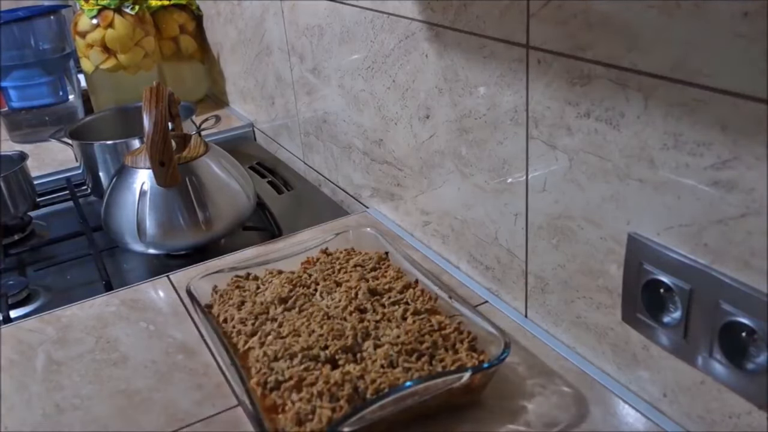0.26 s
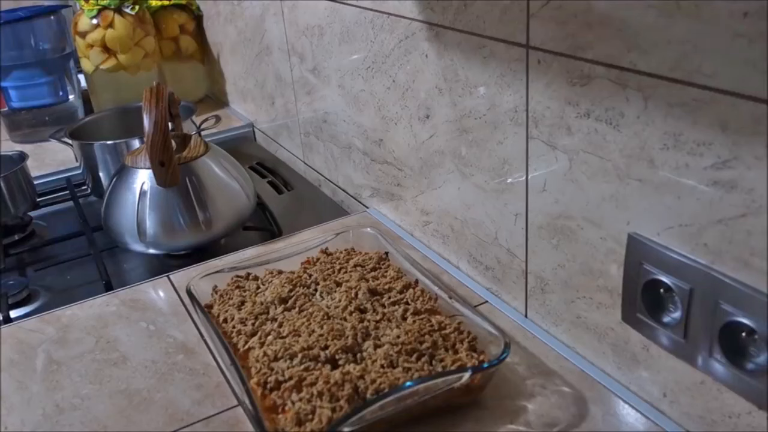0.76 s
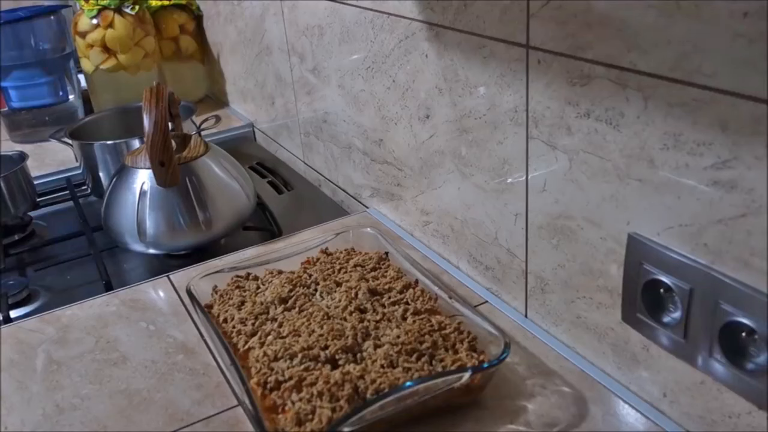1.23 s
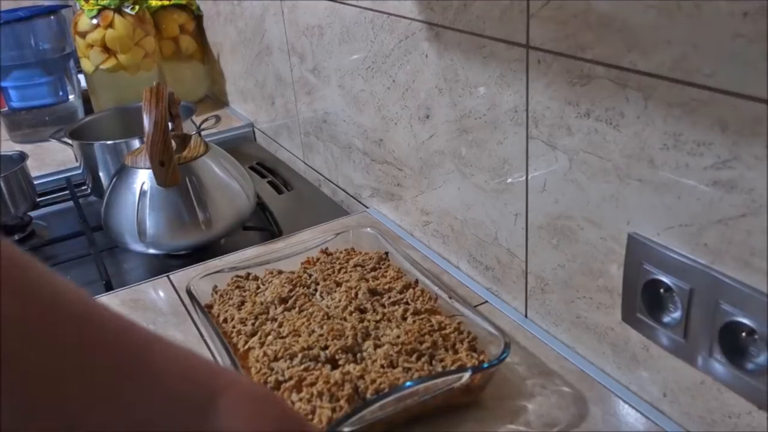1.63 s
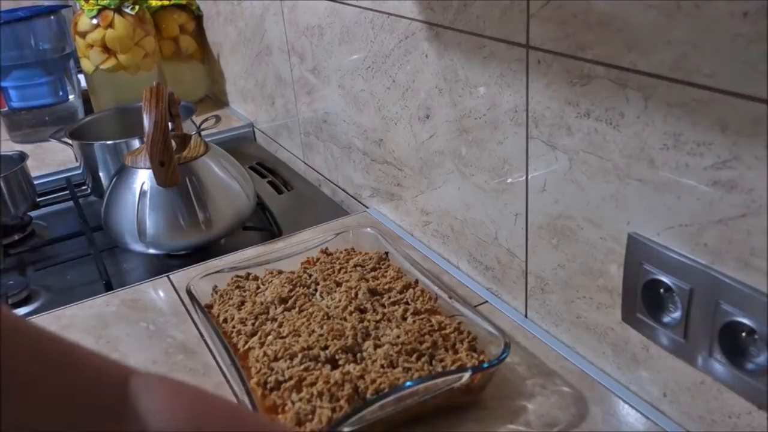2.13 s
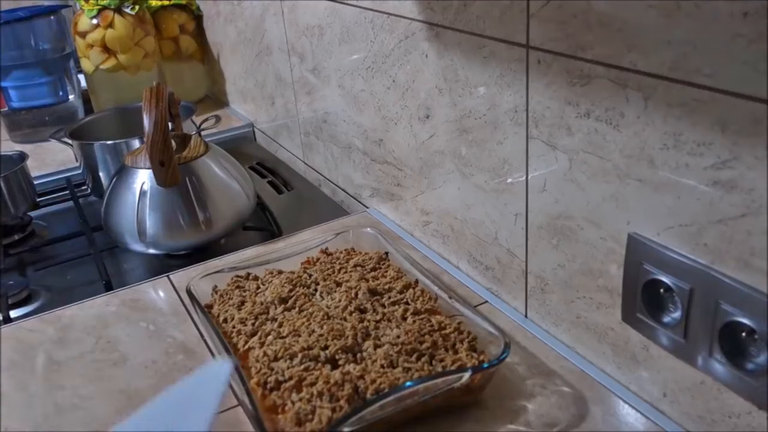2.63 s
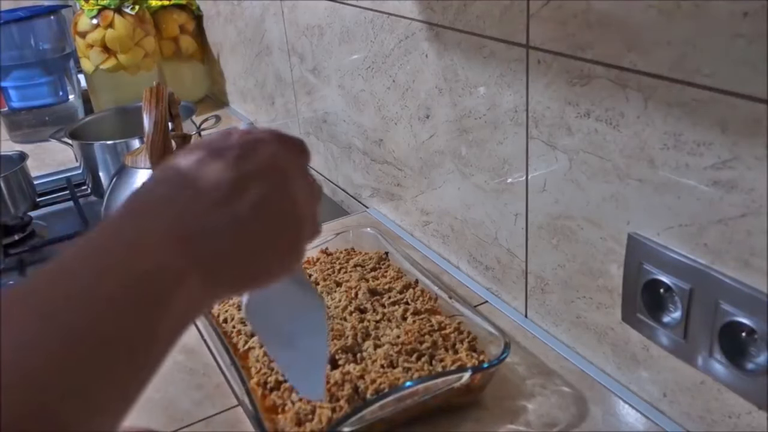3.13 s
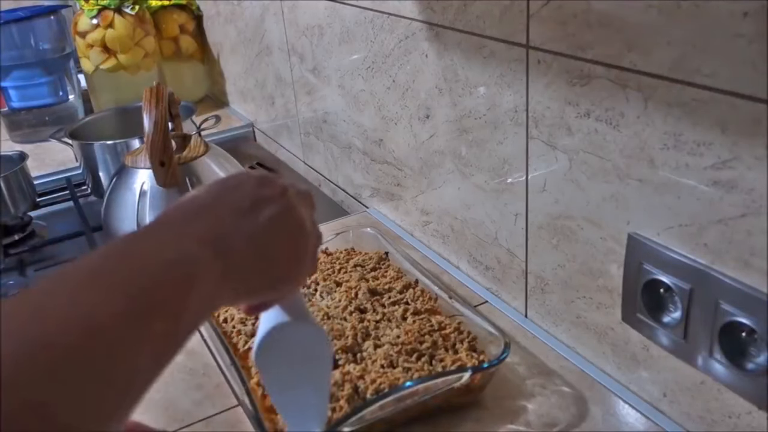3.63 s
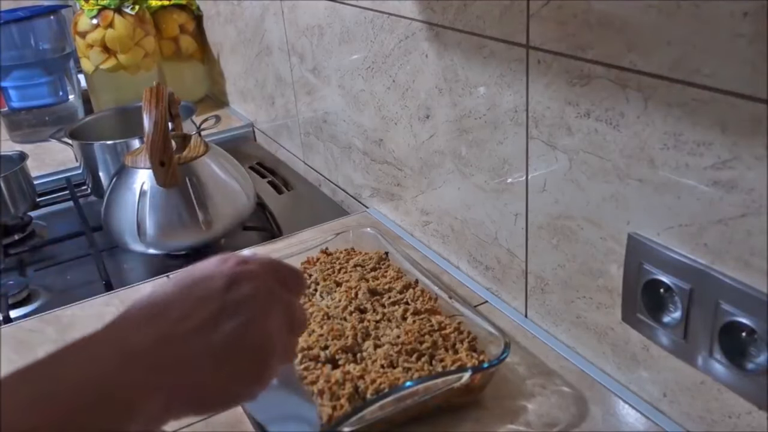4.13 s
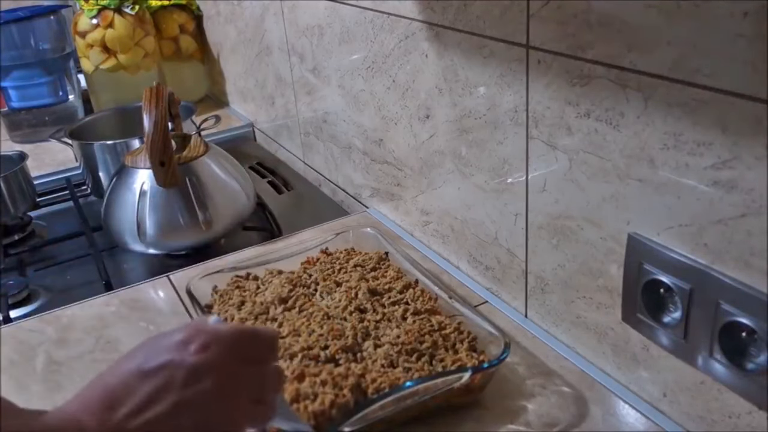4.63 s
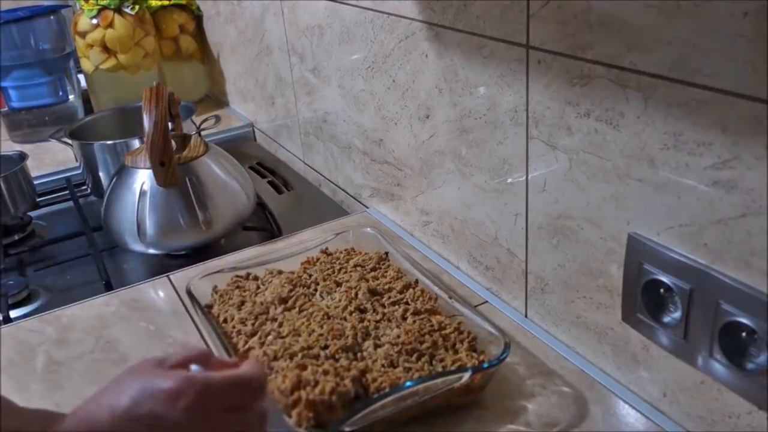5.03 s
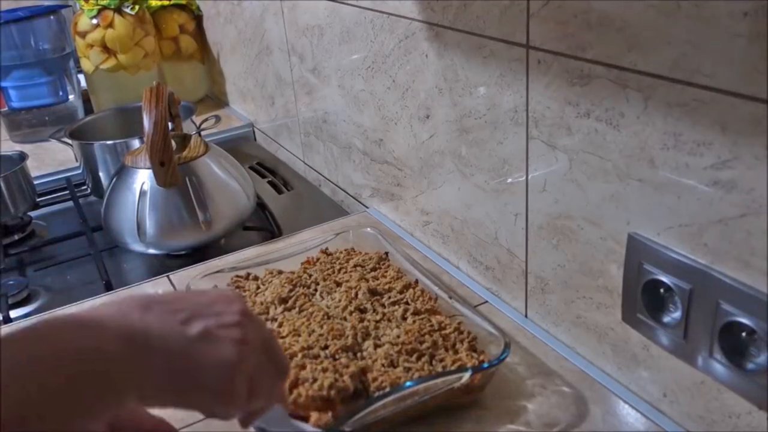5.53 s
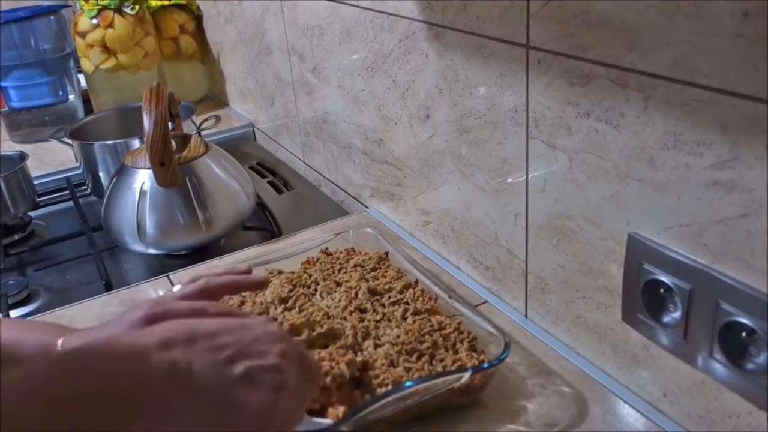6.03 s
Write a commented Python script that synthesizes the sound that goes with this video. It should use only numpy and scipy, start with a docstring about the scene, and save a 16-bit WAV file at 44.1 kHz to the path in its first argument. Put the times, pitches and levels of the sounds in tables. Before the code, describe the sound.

Close stereo microphone in a small echoing tiled kitchen, with soft air hiss and faint mains hum. Light crumb brushes, then a heavy object lands with a loud clattering thud. A hard server scrapes in short bright strokes with sharp knocks on the dish, followed by one long crunching drag. Afterwards it is quieter, with dull knocks and faint rustles until the end.

```python
"""In a quiet tiled kitchen a hard cake server brushes lightly over crumbs, then something heavy lands and rattles.
The blade scrapes in short strokes and one long drag; knocks on the dish and more light brushes follow to the end.
Scrapes and brushes are random clicks that drive resonances; knocks and the landing are fading sines with a noise
burst; a few faint blurred tones are narrow noise. A close pair of microphone ports hears all this with the room's
echoes, over steady air noise, hiss and a mains hum."""
import sys
import numpy as np
from scipy import signal
from scipy.fft import rfft, irfft, next_fast_len
from scipy.io import wavfile
from scipy.ndimage import uniform_filter1d

SR = 44100
rng = np.random.default_rng(int(sys.argv[2]) if len(sys.argv) > 2 else 0)


def wav_out(sig):
    """Save sig, one row per channel (or a flat mono array), as 16-bit PCM at SR to the path in sys.argv[1]."""
    wavfile.write(sys.argv[1], SR, np.round(np.clip(np.atleast_2d(sig).T, -1, 1) * 32767).astype(np.int16))


N = 276941  # length in samples
SPLIT_HZ = 2600  # sounds are levelled separately under and over this pitch


def add_strokes(mix):
    """Short scrapes: crumbs snapping under the blade make it ring, most near the pitch that the grip favours."""
    # scrapes: start_s, rise_s, hold_s, level_db (under 2.6 kHz), treble_db (over 2.6 kHz against level_db),
    # ring_db (rings against the broad body), grip_hz (pitch that the grip favours)
    touches = [(1.498, 0.054, 0.01, -30, 8.5, -7.5, 5550), (1.548, 0.034, 0.059, -25.5, 4, -3, 5130),
               (1.74, 0.015, 0.039, -25.5, 7, -2.5, 6640), (1.926, 0.0085, 0.036, -24, -3, -10, 7160),
               (2.173, 0.0039, 0.056, -29.5, -8.5, -3.5, 4070)]
    # rings of the blade: pitch_hz, width_hz, level_db
    blade_rings = [(363, 67, 1), (1710, 32, 11), (2128, 36, 6.5), (3020, 52, 1), (3310, 32, -0.5),
                   (4075, 43, 2), (5150, 140, -2), (5150, 260, -1), (6180, 40, -4.5), (6450, 93, -3.5),
                   (8010, 27, -2), (10100, 67, -7.5), (10700, 90, -15)]
    # broad colour of the breaking crumbs: pitch_hz, level_db (per Hz)
    crumb_colour = [(59, -53), (100, -16), (363, -3.5), (1240, 0.5), (2090, -4.5), (2590, -13), (8210, -22),
                    (11500, -33.5)]
    favour_db_per_octave = 10  # treble rings fall off away from the favoured pitch
    for *touch, ring_db, grip_hz in touches:
        rows = gesture(*touch, start_db=-9, fade_db_per_s=130, dull_db_per_s=44)
        gripped = []
        for hz, width, db in blade_rings:
            if hz > SPLIT_HZ:
                db = db - favour_db_per_octave * abs(np.log2(hz / grip_hz))
            gripped.append((hz, width, db))
        add(mix, *friction(rows, crumb_colour, gripped, ring_db, snaps_per_s=2200.0, spread_db=3.5, rub=0.84,
                           judder_db=2.0, patchy_db=5.0))


def add_drag(mix):
    """One long drag over crumbs and glass: the rings sag in pitch as the blade is pressed."""
    # course of the drag: time_s, level_db (under 2.6 kHz), treble_db (over 2.6 kHz against level_db)
    course = [(2.355, -37, -1), (2.385, -29, -1.5), (2.5, -24.5, -4.5), (2.66, -20, -7), (2.75, -18, -8),
              (2.98, -18.5, -10), (3.098, -24, -7.5), (3.19, -28.5, -13.5), (3.35, -43, -5), (3.62, -60, 0)]
    # rings under the drag: pitch_hz, width_hz, level_db
    drag_rings = [(390, 61, -11), (967, 116, -0.5), (1525, 143, -4.5), (1980, 145, 5), (3494, 67, 4),
                  (4944, 76, -0.5), (5420, 66, -1), (6087, 33, 3.5), (7450, 120, -11), (8250, 100, -13),
                  (10060, 61, -16.5), (10630, 45, -15)]
    # broad colour of the breaking crumbs: pitch_hz, level_db (per Hz)
    crumb_colour = [(59, -77), (100, -42), (378, -17), (1490, -5.5), (4260, -19.5), (6210, -20.5),
                    (10400, -38), (11500, -46)]
    # pressing bends rings under 5.7 kHz and shifts the balance:
    # time_s, pitch_factor, deep_db (rings under 1.7 kHz), shrill_db (rings over 2.6 kHz)
    pressing = [(2.4, 1.04, 2, -10), (2.65, 1.014, 0, -7), (2.75, 0.99, 2, -2), (3.0, 0.99, 6, -4),
                (3.3, 0.99, 8, -14)]
    add(mix, *friction(course, crumb_colour, drag_rings, 6.3, snaps_per_s=2800.0, spread_db=3.0, rub=0.76,
                       judder_db=1.0, patchy_db=2.5, press=pressing))


def add_landing(mix):
    """The heavy thing lands and rocks: each contact rings its modes over a short thud."""
    # contacts: start_s, peak_db (under 2.6 kHz), ring_db (rings against the thud)
    contacts = [(.889, -5, -0.5), (.915, -8.5, 1), (.945, -11.5, -4.5), (0.999, -19, -14),
                (1.042, -35, -26), (1.075, -26.5, -24)]
    # modes of the heavy thing: pitch_hz, level_db, t60_s (time to fade by 60 dB)
    heavy_modes = [(141, -5, 0.2), (276, 7, 0.15), (367, 11.5, 0.24), (574, -9, 0.067), (720, 8, 0.12),
                   (816, 1, 0.24), (1142, -1.5, 0.37), (2902, 5, 0.48), (3240, 10, 0.23), (4060, 19, 0.15),
                   (5610, 9, 0.099), (7640, 6, 0.061)]
    tick_db = -29.5  # every contact ticks alike over 2.6 kHz, however hard
    for s, peak_db, ring_db in contacts:
        add(mix, s, blow(heavy_modes, peak_db, tick_db - peak_db, ring_db, spot_hz=1310, crack_s=0.031,
                         tick_s=0.018, crack_hz=970, rise_s=0.0008, luck_db=2.5, detune=0))


def add_knocks(mix):
    """Knocks on the dish: each blow rings the dish and sends a dull thud through the worktop."""
    # knocks: start_s, peak_db (under 2.6 kHz), treble_db (over 2.6 kHz against peak_db),
    # spot_hz (pitch that the struck spot favours), ring_db (rings against the crack),
    # thud_db (peak of the worktop), thud_hz (pitch that the thud favours)
    hits = [(0.729, -38, 6, 1100, -10, -37, 348), (0.737, -45, 15, 3500, -15, -50, 350),
            (1.37, -49, -22, 1010, 5, -49, 350), (1.551, -10, 0.5, 2060, 1, -52, 362),
            (1.752, -22.5, 13, 2190, -10, -49, 370), (1.817, -20.5, 6, 2100, -20, -45, 370),
            (1.935, -12, 3.5, 1390, -15, -21, 368), (1.982, -10.5, -20, 1490, -6.5, -20, 380),
            (2.03, -19.5, 1.5, 1200, -2, -28.5, 403), (2.287, -26, -3, 858, -7, -10.5, 360),
            (2.311, -38, 4, 900, 9, -31, 362), (2.52, -14.5, -1.5, 1620, -11, -19.5, 367),
            (2.989, -8, -8, 1540, -8, -23.5, 380), (3.824, -19.5, -23, 1470, -1, -13, 443),
            (3.863, -28.5, -29, 1800, -9, -29, 447), (4.087, -36.5, 3, 1210, -13, -48, 400),
            (4.181, -37, 5, 1230, -14, -40, 460), (4.725, -56, -21, 800, -4, -33.5, 402),
            (5.206, -25, -16, 1000, -8, -22.5, 435), (5.33, -40, 5, 1260, -10, -34, 496),
            (5.438, -20, -22, 1780, -3, -33, 420), (5.552, -39, -11, 804, -5, -32.5, 370),
            (5.606, -55, -15, 800, -5, -35.5, 370), (5.637, -20.5, -14, 1480, -19, -31, 453),
            (5.745, -15, -7, 2100, 4, -26.5, 457), (6.042, -38.5, -10, 885, 20, -32.5, 264)]
    # modes of the dish: pitch_hz, level_db, t60_s
    dish_modes = [(858, 2, 0.04), (990, -16, 0.1), (1200, -22, 0.059), (1500, -30, 0.045),
                  (1784, -5.5, 0.065), (2167, -3.5, 0.044), (3520, -1, 0.062), (3850, -7, 0.056),
                  (4970, -3.5, 0.07)]
    # modes of the worktop: pitch_hz, level_db, t60_s
    worktop_modes = [(251, -10, 0.15), (372.5, 2.5, 0.094), (443, 0.5, 0.072), (568, -3.5, 0.11)]
    for s, peak_db, treble_db, spot_hz, ring_db, thud_db, thud_hz in hits:
        add(mix, s, blow(dish_modes, peak_db, treble_db, ring_db, spot_hz, crack_s=0.013, tick_s=0.011,
                         crack_hz=1930, rise_s=0.0026, luck_db=4.5, detune=0.0089))
        add(mix, s, blow(worktop_modes, thud_db, -52, 6, thud_hz, crack_s=0.021, tick_s=0.0024,
                         crack_hz=550, rise_s=0.0046, luck_db=1.5, detune=.006))


def add_rustles(mix):
    """Light brushes over the crumbs: soft, even snaps with little ringing."""
    # brushes: start_s, rise_s, hold_s, level_db (under 2.6 kHz), treble_db (over 2.6 kHz against level_db)
    brushes = [(0.24, 0.048, 0.0095, -45, -6), (0.507, 0.0052, 0.0093, -41, 0.5),
               (0.725, 0.0022, 0.0066, -44.5, 5.5), (0.754, 0.0067, 0.018, -42.5, -24),
               (1.148, 0.14, 0.11, -50.5, -34), (3.623, 0.14, .04, -51.5, -4.5),
               (4.097, .02, 0.2, -58.5, -8), (5.318, 0.012, 0.064, -50.5, -3),
               (5.481, 0.13, 0.12, -47.5, -7), (5.756, 0.011, 0.12, -50.5, -6.5),
               (6.024, 0.065, 0.013, -51, -7)]
    # rings under the brushes: pitch_hz, width_hz, level_db
    brush_rings = [(1160, 350, 4.5), (2200, 43, -5), (3560, 160, 4.5), (5130, 77, -15)]
    # broad colour of the crumbs: pitch_hz, level_db (per Hz)
    crumb_colour = [(59, -61), (100, -4), (323, -7), (906, -17.5), (5410, -9.5), (10800, -21), (11500, -20)]
    for brush in brushes:
        rows = gesture(*brush, start_db=-6.5, fade_db_per_s=119, dull_db_per_s=-9)
        add(mix, *friction(rows, crumb_colour, brush_rings, -9.5, snaps_per_s=2600.0, spread_db=0.5, rub=0.67,
                           judder_db=1.7, patchy_db=5.0))


def add_blurred_tones(mix):
    """Brief blurred tones: noise through a narrow resonance. Some sound as if a rub fed one mode of the
    worktop; others ring along with a knock on the dish."""
    # tones: start_s, length_s, pitch_hz, level_db
    tones = [(0.735, 0.136, 339, -42.5), (5.225, 0.059, 450, -36.5), (4.09, 0.041, 1200, -39),
             (5.325, 0.028, 1300, -47)]
    width_hz, fade_db = 24, -7  # the fade is spread over the whole length
    for start, length, hz, level_db in tones:
        t = np.arange(0, length, 1 / SR)
        once = resonate(rng.standard_normal(len(t)), hz, width_hz)
        tone = evened(resonate(once, hz, width_hz))
        level = gain_of(level_db + fade_db * t / length)
        add(mix, start, level * tone * signal.windows.tukey(len(t), .15))


def utensil():
    """All that the hands set ringing, before the room."""
    mix = np.zeros(N)
    add_strokes(mix)
    add_drag(mix)
    add_landing(mix)
    add_knocks(mix)
    add_rustles(mix)
    add_blurred_tones(mix)
    return mix


def gesture(start, rise, hold, level_db, treble_db, start_db, fade_db_per_s, dull_db_per_s):
    """Rise, hold and release of one touch as rows (time_s, level_db, treble_db); the colour drifts in release."""
    release_s = .2
    top = start + max(rise, .002)
    end = top + max(hold, .002)
    return [(start, level_db + start_db, treble_db),
            (top, level_db, treble_db),
            (end, level_db, treble_db),
            (end + release_s, level_db - fade_db_per_s * release_s, treble_db - dull_db_per_s * release_s)]


def friction(rows, body, ring, ring_db, snaps_per_s, spread_db, rub, judder_db, patchy_db, press=((0, 1, 0, 0),)):
    """Crumbs snap under the blade: clicks of uneven size over a fine rub drive a broad body and the rings."""
    s, level_db, treble_db = np.transpose(rows)
    t = np.arange(s[0], s[-1], 1 / SR)
    fine, chance, size = rng.standard_normal((len(t), 3)).T
    snapping = abs(chance) < 1.25 * snaps_per_s / SR  # 1.25 turns the bell curve's height into a rate
    snaps = gain_of(spread_db * abs(size)) * np.sign(size) * snapping
    grip = gain_of(judder_db * wander(len(t), 0.019))  # the grip slips and holds
    drive = (evened(snaps) + rub * fine) * grip

    at, factor, deep_db, shrill_db = np.transpose(press)
    sag = np.interp(t, at, factor)
    deep, shrill = gain_of(np.interp(t, at, deep_db)), gain_of(np.interp(t, at, shrill_db))
    rung = np.zeros(len(t))
    for k, (hz, width, db) in enumerate(ring):
        fed = drive * gain_of(patchy_db * wander(len(t), 0.016))  # the contact moves on and off each mode
        if hz < 1700:
            fed *= deep
        elif hz > SPLIT_HZ:
            fed *= shrill
        pitch = hz * (1 + 0.013 * wander(len(t), 0.034))  # the contact pulls the pitch about
        if hz < 5700:
            pitch = pitch * sag
        rung += (-1) ** k * gain_of(db) * resonate(fed, pitch, width)  # neighbours take opposite signs

    low, high = halves(evened(coloured(drive, body)) + gain_of(ring_db) * evened(rung))
    sound = evened(low) + gain_of(np.interp(t, s, treble_db)) * evened(high)
    level = gain_of(np.interp(t, s, level_db))
    return s[0], level * sound * signal.windows.tukey(len(t), .03)


def blow(modes, peak_db, treble_db, ring_db, spot_hz, crack_s, tick_s, crack_hz, rise_s, luck_db, detune):
    """A blow rings the modes near the struck spot's pitch, over a burst of modes too dense to tell apart."""
    t = np.arange(SR // 2) / SR
    hz, db, t60 = np.transpose(modes)[:, :, None]
    level_luck, pitch_luck = rng.standard_normal((2, len(modes), 1))
    octaves_off = np.minimum(abs(np.log2(hz / spot_hz)), 1.2)
    db = db + luck_db * level_luck - 13.3 * octaves_off
    tones = np.sin(2 * np.pi * hz * (1 + detune * pitch_luck) * t)
    rings = (gain_of(db - 60 * t / t60) * tones).sum(0)

    # spectrum of the burst: (Hz, dB)
    burst_colour = [(80, -18), (160, 0), (crack_hz, 0), (2.0 * crack_hz, -14), (12000, -24)]
    thump, tick = halves(coloured(rng.standard_normal(len(t)), burst_colour))
    crack = thump * np.exp(-t / crack_s) + tick * np.exp(-t / tick_s)  # the treble dies first

    low, high = halves(gain_of(ring_db) * rings / abs(rings).max() + crack / abs(crack).max())
    low = low * np.minimum(t / rise_s, 1)  # the bass takes longer to build
    sound = low / abs(low).max() + gain_of(treble_db) * high / abs(high).max()
    lowest_hz = 0.73 * modes[0][0]  # nothing radiates far under the first mode
    return gain_of(peak_db) * signal.sosfilt(signal.butter(4, lowest_hz, "high", fs=SR, output="sos"), sound)


def kitchen(x, wet_db, side_wet_db):
    """Mid: direct sound and tail. Side: another tail and early wall echoes, strong only in the treble."""
    # how long the room rings: pitch_hz, t60_s
    room_fade = [(120, 0.4), (330, 0.72), (870, 0.5), (2300, 0.41), (6000, 0.44), (11000, 0.46)]
    # what the port spacing leaves in the difference: pitch_hz, side_db (filter on the side)
    port_colour = [(60, -33), (130, -22), (270, -53), (570, -17), (1210, -10.5), (2570, -8), (5450, -1.5),
                   (11600, 2)]
    taps = np.zeros((2, SR))
    # one echo of random sign at a random place in every 20 samples
    at = np.arange(100, SR - 20, 20) + rng.integers(0, 20, (2, (SR - 101) // 20))
    np.put_along_axis(taps, at, rng.choice([-1., 1.], at.shape), 1)
    hz, t, z = signal.stft(taps, SR, nperseg=256)
    thin = (hz / (hz + 600))[:, None]  # the echoes carry little bass; low sounds stay compact
    fade = gain_of(-60 * t / read(room_fade, hz)[:, None])
    tail = signal.istft(z * fade * thin, SR, nperseg=256)[1]
    tail *= 1 + 0.98 * np.exp(-np.arange(tail.shape[1]) / SR / 0.0069)  # near tiles throw strong early echoes
    tail *= gain_of([[wet_db], [side_wet_db]]) / np.linalg.norm(tail[0])
    # the direct path reaches the two ports a moment apart
    tail[:, 0] = (1, -.6)
    tail[1, 4] = .3
    tail /= np.linalg.norm(tail, axis=1, keepdims=True)
    mid, side = signal.fftconvolve(x[None], tail, axes=1)[:, :N]
    return np.array([mid, coloured(side, port_colour) - 0.056 * mid])  # leans a little to the right


def floor():
    """Room air and port hiss, slowly breathing in level, and a wavering mains hum in the middle."""
    # colour of the air and hiss: pitch_hz, level_db (per Hz; only the shape counts)
    air_colour = [(15, -45), (25, -19), (58, -6), (147, -3.5), (279, 1.5), (862, -11), (2600, -15.5),
                  (3190, -12), (7830, -17.5), (10600, -23), (11500, -24.5)]
    # width of the hiss: pitch_hz, side_db (side against mid)
    air_width = [(60, -9), (170, -14), (490, -9), (1410, 0), (4030, -3.5), (11600, 1.5)]
    # mains hum: pitch_hz, level_db (rms, before it wavers)
    mains = [(49.5, -63.5), (99, -69), (197, -67.5)]
    floor_db = -54.5  # rms of the mid, before it breathes
    mid, side, drift, waver = rng.standard_normal((4, N))
    noise = coloured(np.array([mid, coloured(side, air_width)]), air_colour)
    breath = evened(uniform_filter1d(drift, 4000))
    noise *= gain_of(floor_db + 1.0 * breath) / noise[0].std()
    t = np.arange(N) / SR
    waver = evened(uniform_filter1d(uniform_filter1d(waver, 3000), 3000))
    for hz, db in mains:
        tone = np.sin(2 * np.pi * (hz * t + rng.random()))
        noise[0] += np.sqrt(2) * gain_of(db + 1.8 * waver) * tone
    return noise


def gain_of(db):
    """Decibels to gain."""
    return 10 ** (np.asarray(db) / 20)


def evened(x):
    """Scales to rms 1."""
    return x / np.sqrt(np.mean(x ** 2) + 1e-20)


def read(points, hz):
    """Reads a table on a log-frequency axis."""
    f, value = np.transpose(points)
    return np.interp(np.log(hz + 1), np.log(f + 1), value)


def coloured(x, points):
    """Filters by a spectrum in dB."""
    length = x.shape[-1]
    size = next_fast_len(length)
    gain = gain_of(read(points, np.fft.rfftfreq(size, 1 / SR)))
    return irfft(rfft(x, size) * gain, size)[..., :length]


def add(mix, s, sound):
    """Mixes a sound in at a time in seconds."""
    part = mix[round(s * SR):][:len(sound)]
    part += sound[:len(part)]


def resonate(x, hz, width):
    """Shifts the curve hz down to zero, smooths, and shifts back: a resonance of gain 1."""
    turn = np.exp(2j * np.pi * np.cumsum(hz * np.ones(len(x))) / SR)
    r = np.exp(-np.pi * width / SR)
    return 2 * (turn * signal.lfilter([1 - r], [1, -r], x / turn)).real


def halves(x):
    """The parts under and over 2.6 kHz."""
    return [signal.sosfilt(signal.butter(5, SPLIT_HZ, kind, fs=SR, output="sos"), x) for kind in ("low", "high")]


def wander(length, seconds):
    """Slow random drift of rms 1: noise smoothed twice over the given time."""
    size = round(seconds * SR)
    return evened(uniform_filter1d(uniform_filter1d(rng.standard_normal(length), size), size))


def scene():
    """Mid and side turned into left and right."""
    mid, side = kitchen(utensil(), wet_db=-2.5, side_wet_db=11.5) + floor()
    return np.array([mid + side, mid - side])


def record(dry):
    """Cuts everything above the band limit."""
    edge_hz = 11080
    return signal.oaconvolve(dry, signal.firwin(511, edge_hz, window=("kaiser", 9), fs=SR)[None], "same")


dry = scene()
out = record(dry)
wav_out(out)
```